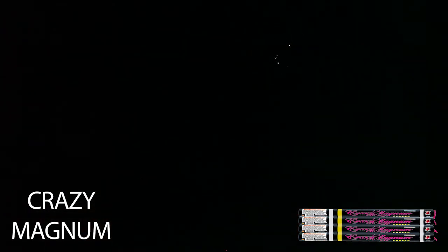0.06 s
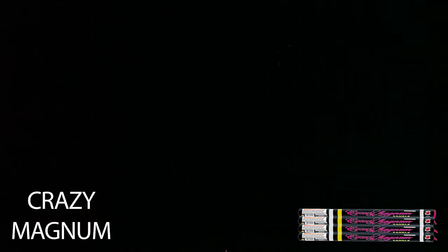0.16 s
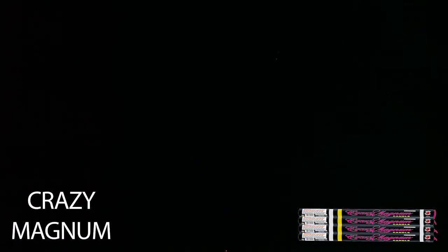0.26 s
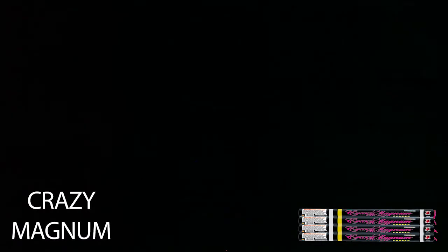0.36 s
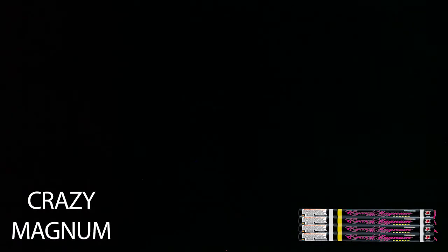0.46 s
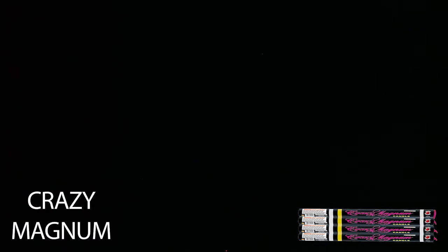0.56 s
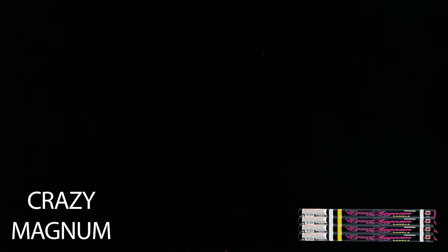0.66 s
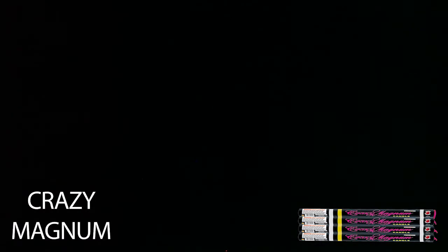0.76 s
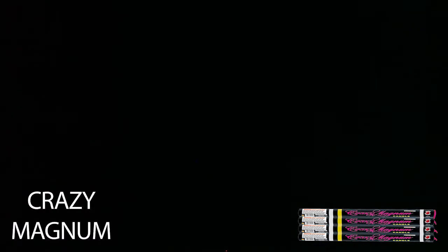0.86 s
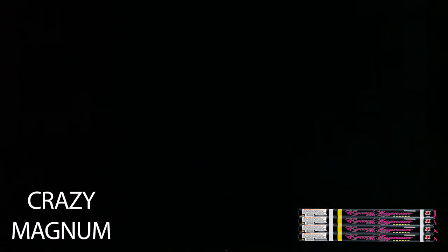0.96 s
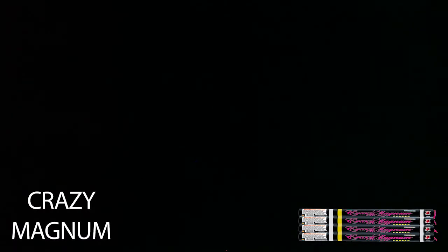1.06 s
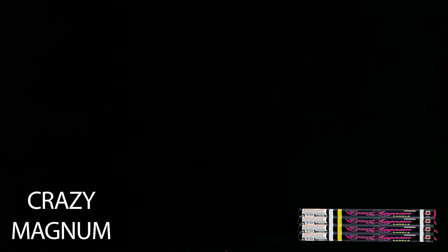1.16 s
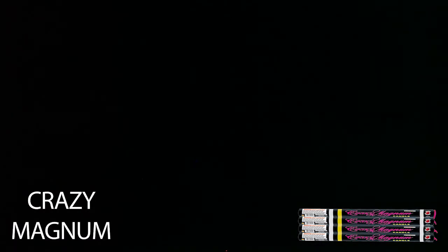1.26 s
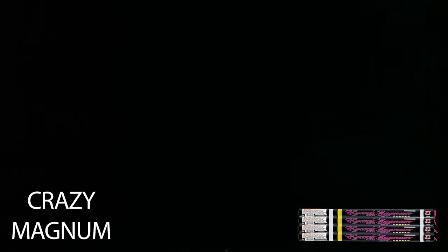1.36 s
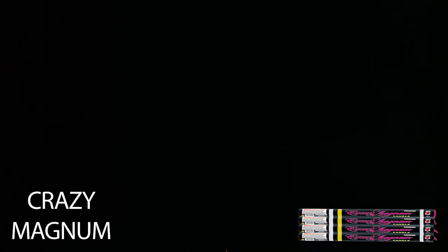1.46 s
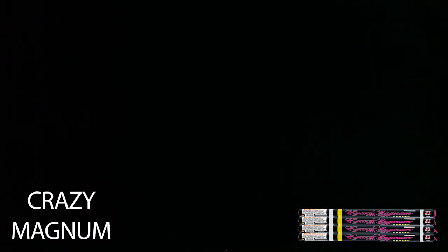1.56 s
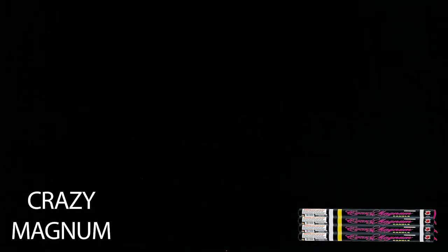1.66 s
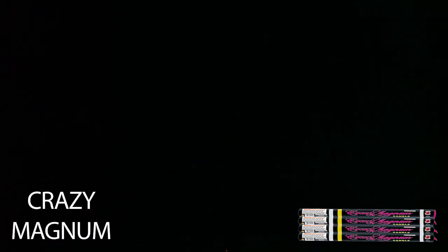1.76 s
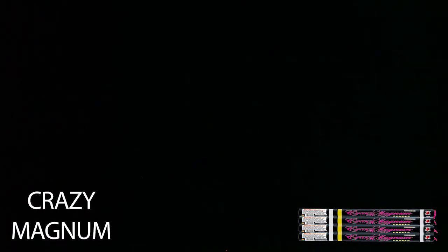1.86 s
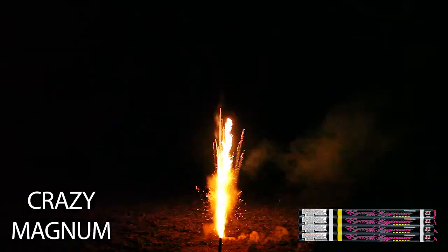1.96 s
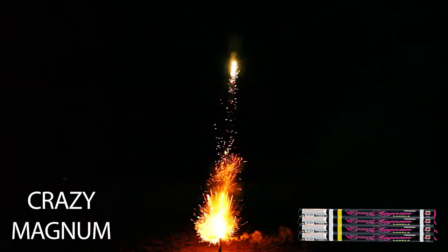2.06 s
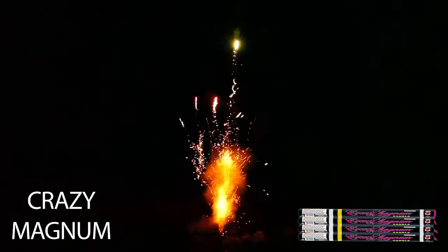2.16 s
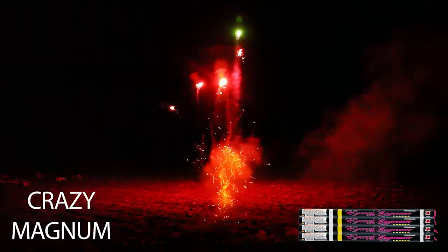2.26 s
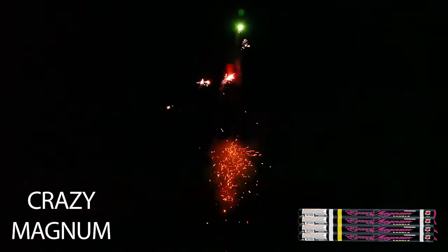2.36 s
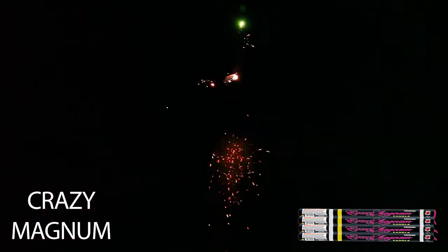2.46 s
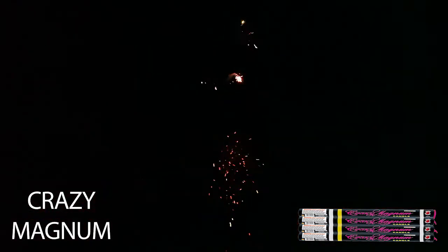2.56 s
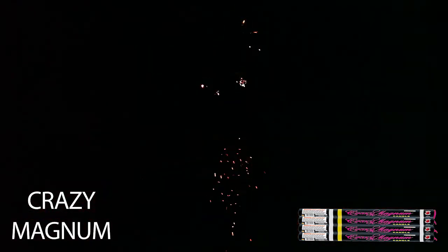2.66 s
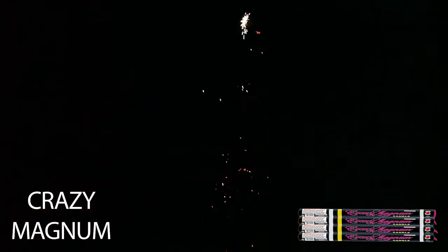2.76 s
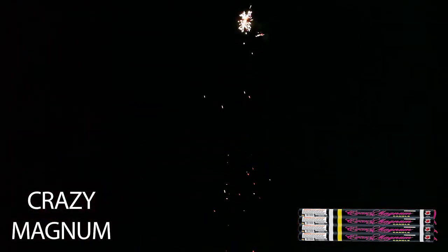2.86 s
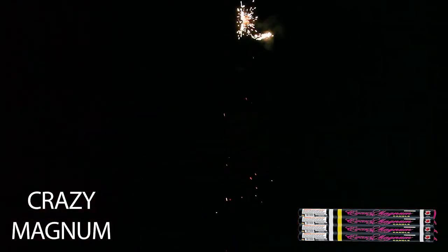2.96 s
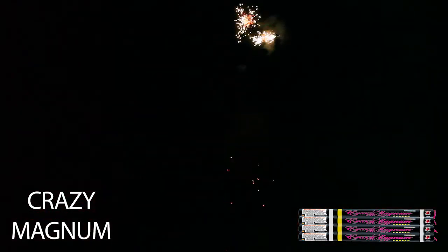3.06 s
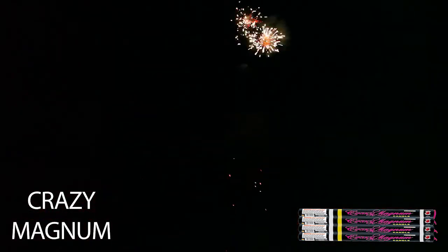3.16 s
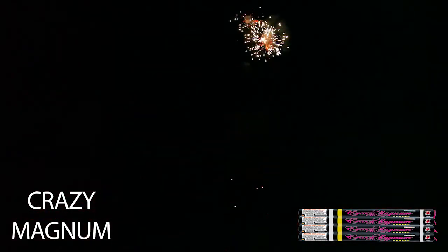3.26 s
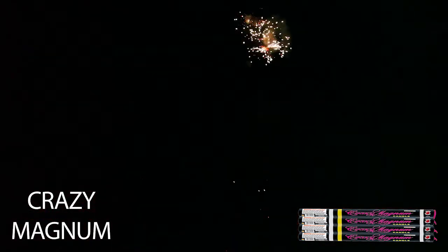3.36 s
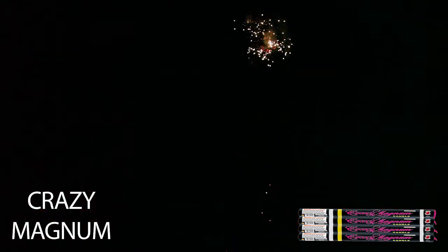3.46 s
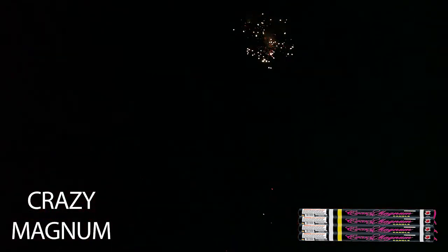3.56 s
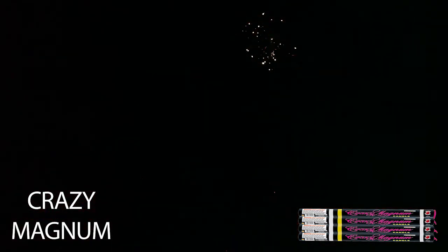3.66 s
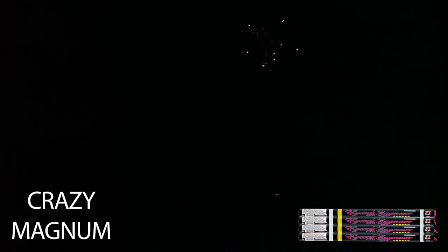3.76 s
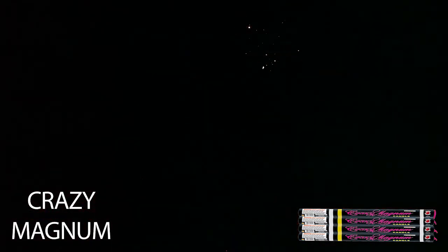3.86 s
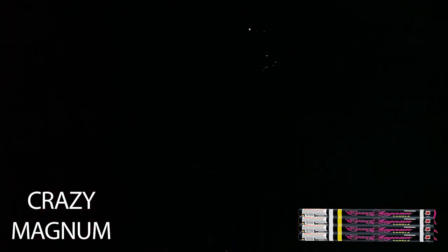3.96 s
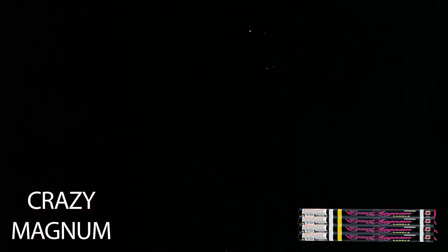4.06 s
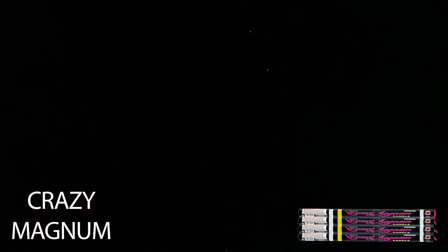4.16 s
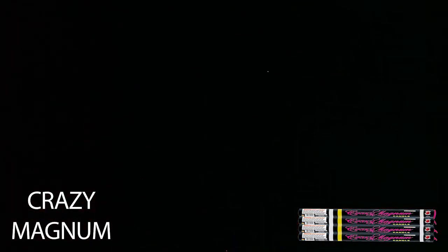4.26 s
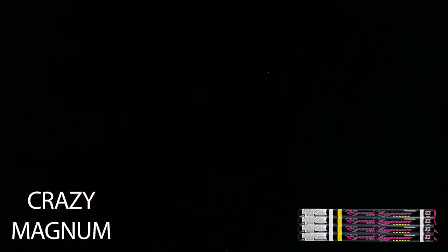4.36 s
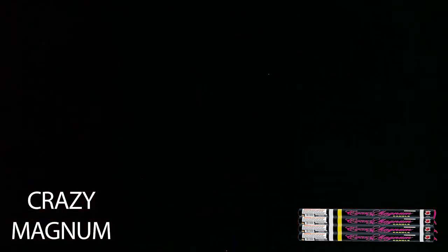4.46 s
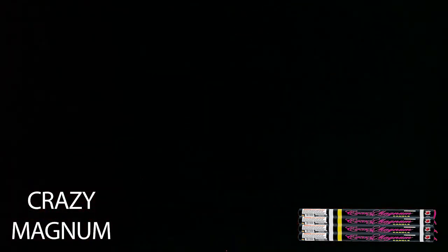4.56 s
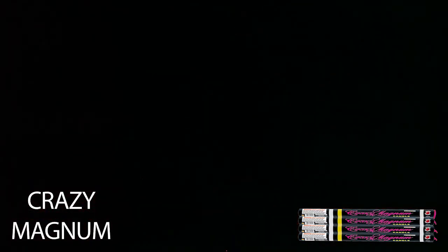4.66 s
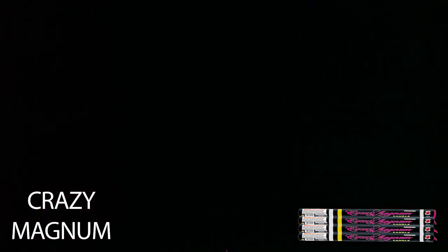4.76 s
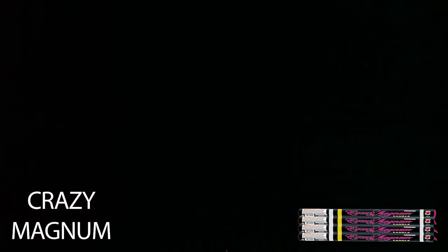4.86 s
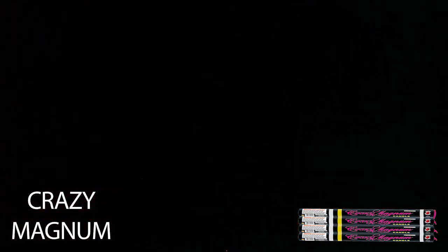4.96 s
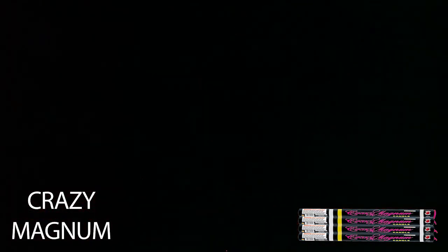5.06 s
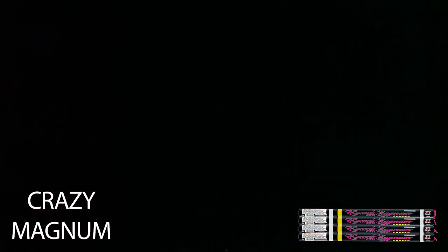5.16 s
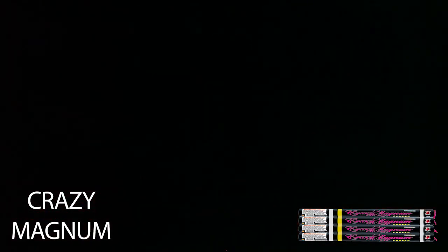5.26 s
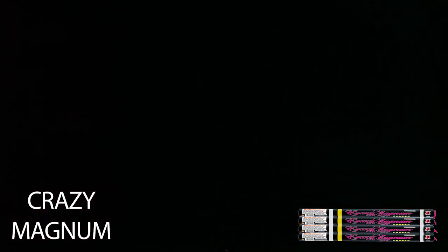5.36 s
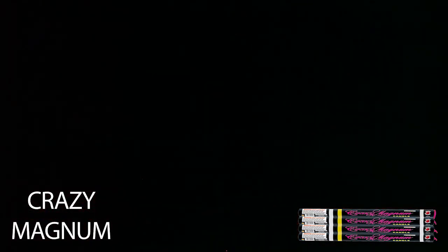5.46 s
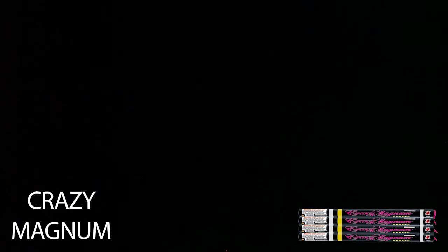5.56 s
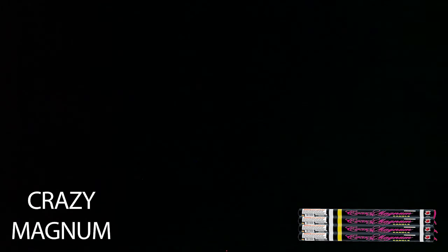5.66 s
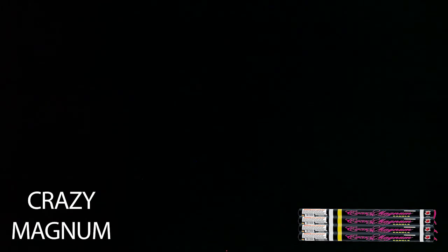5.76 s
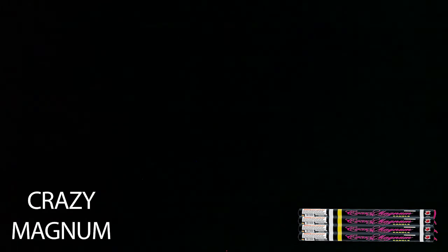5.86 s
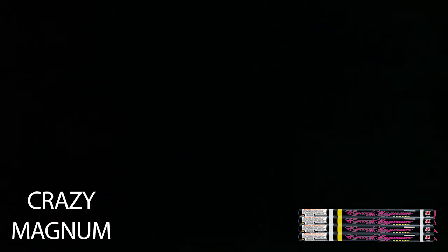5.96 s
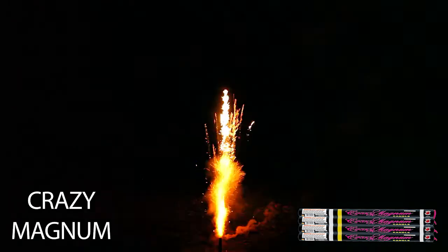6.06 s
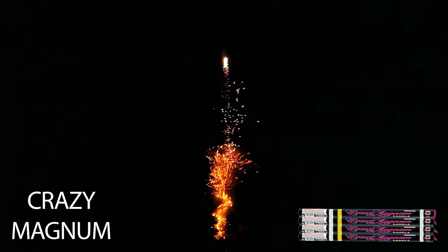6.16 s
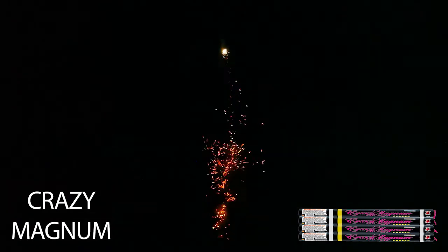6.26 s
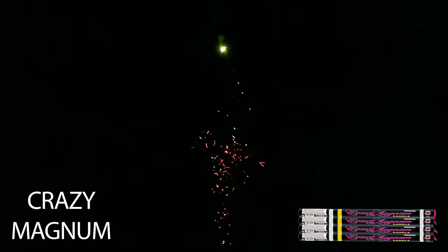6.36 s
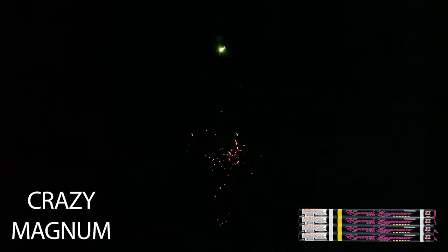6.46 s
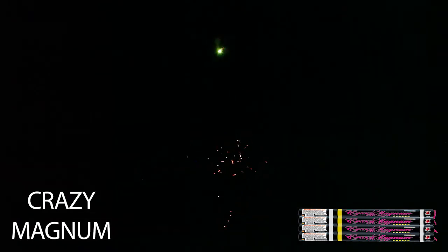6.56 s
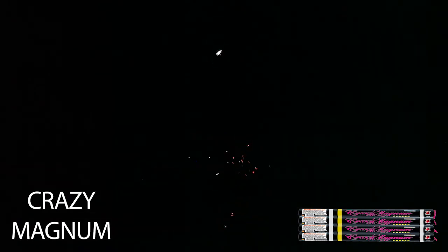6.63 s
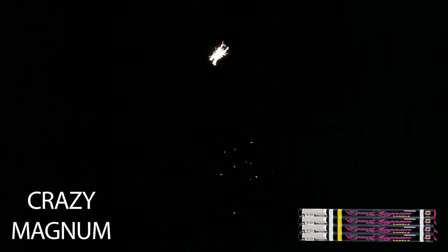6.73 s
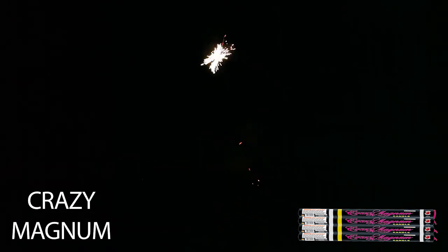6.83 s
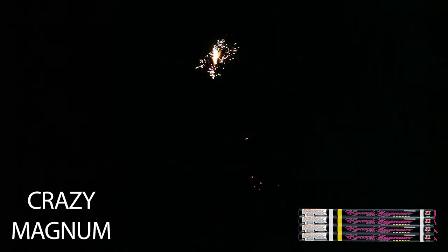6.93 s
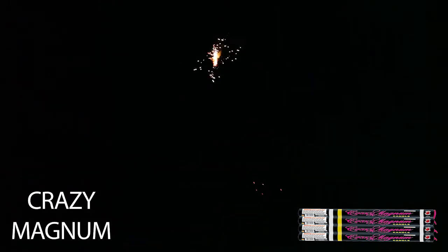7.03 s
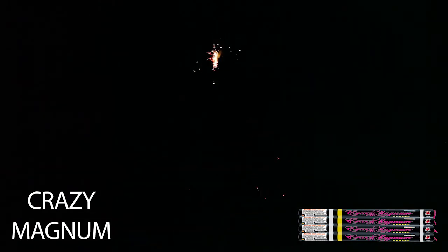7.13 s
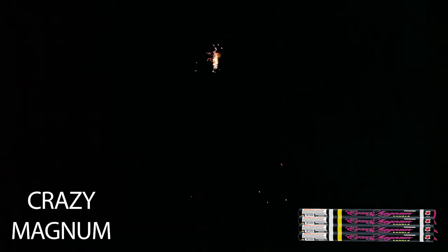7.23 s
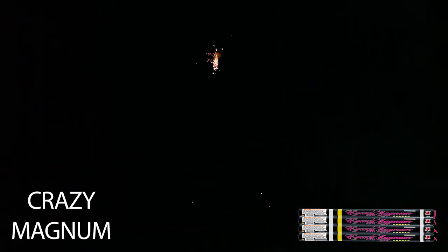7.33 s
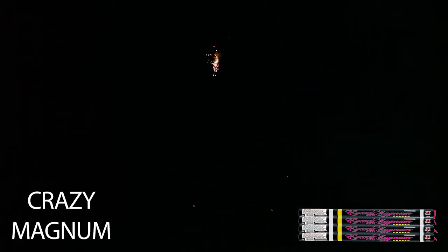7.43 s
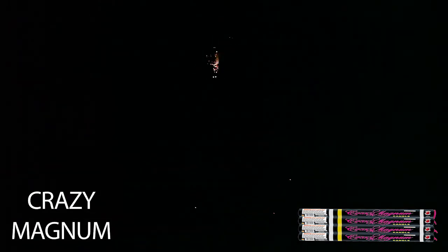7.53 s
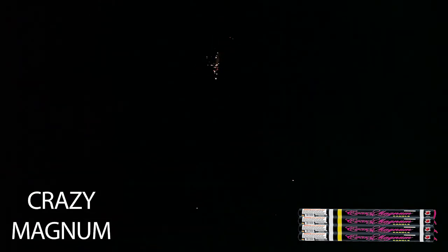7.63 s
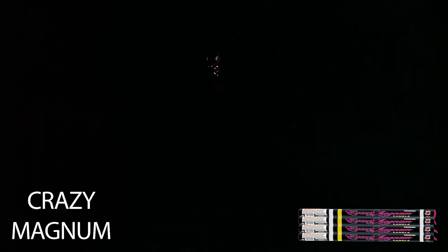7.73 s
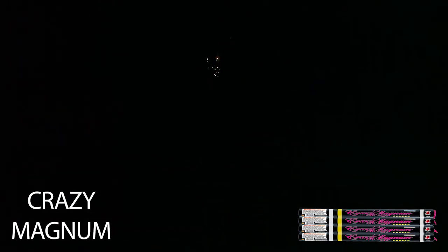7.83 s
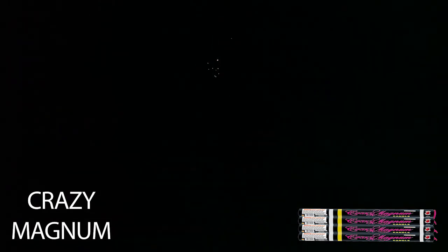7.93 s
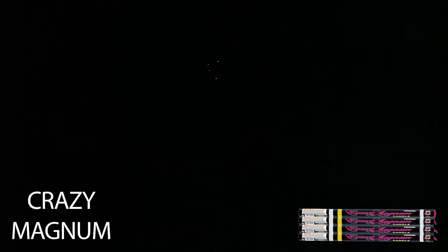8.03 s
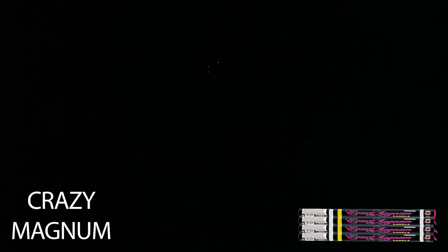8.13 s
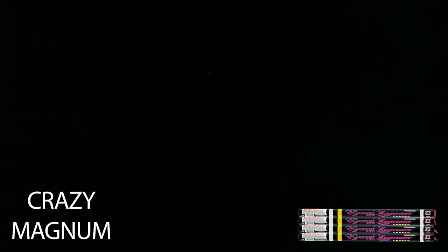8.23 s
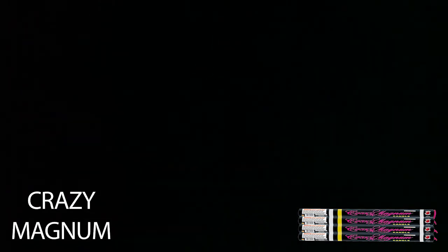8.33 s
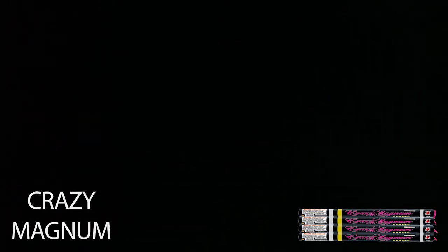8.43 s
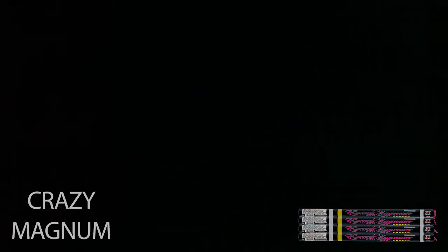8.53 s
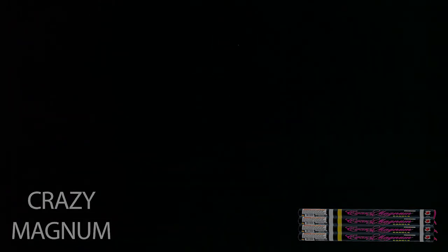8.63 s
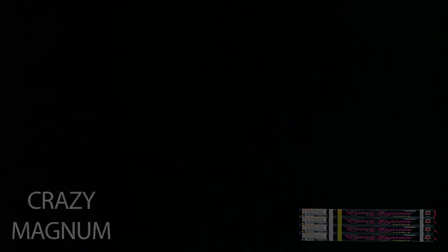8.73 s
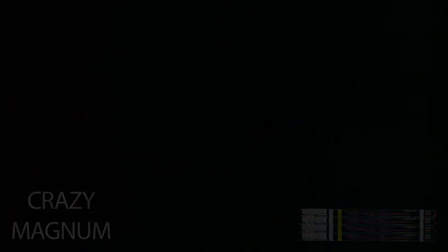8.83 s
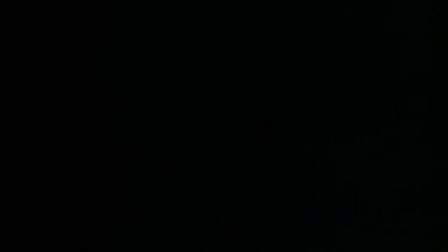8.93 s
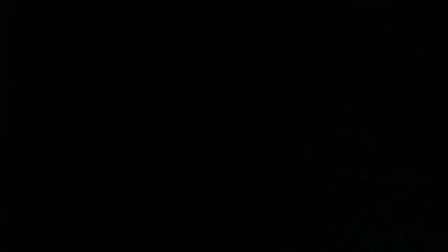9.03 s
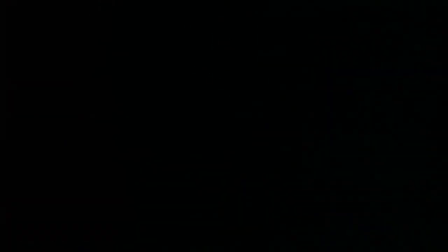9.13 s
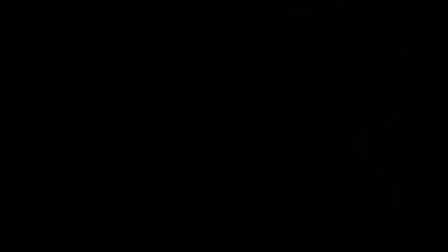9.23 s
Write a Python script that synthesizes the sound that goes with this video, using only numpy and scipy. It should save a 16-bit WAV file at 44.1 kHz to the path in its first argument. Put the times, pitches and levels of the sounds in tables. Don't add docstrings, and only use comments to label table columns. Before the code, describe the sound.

Close outdoor pickup of a firework tube at night: weak uneven fizzing, a quick double bang with low thumps and short field echoes, spitting embers, then a rough crackling rush in the air. The fuse burns on with a hollow, resonant sputter. One stronger bang follows, then a brief rapidly pulsing burn and a bright snap. Dull taps and soft rustling remain, with hiss and wind pumping back before the fade.

```python
import sys
import numpy as np
from scipy import signal
from scipy.fft import rfft, irfft
from scipy.io import wavfile
from scipy.ndimage import uniform_filter1d

SR = 44100
rng = np.random.default_rng(int(sys.argv[2]) if len(sys.argv) > 2 else 0)


def bounce(signal):
    frames = np.transpose(np.atleast_2d(signal))
    limited = np.clip(frames, -1, 1)
    pcm = np.round(limited * 32767).astype(np.int16)
    wavfile.write(sys.argv[1], SR, pcm)


def natural_amplitude(level_db):
    exponent = np.asarray(level_db, float) / 20
    return 10 ** exponent


N = 409813

# pitch_hz, level_db (per Hz)
STAR = [(70, -54.5), (120, -29.5), (325, -1), (520, -8), (700, -1), (1000, -2.5), (3800, 0), (4870, -2),
        (5610, -9), (6740, -11.5), (8300, -14.5), (9300, -20.5), (13000, -20.5), (15600, -31)]


def evened(x):
    return x / np.sqrt(np.mean(x ** 2) + 1e-20)


def read(points, hz):
    f, value = np.transpose(points)
    return np.interp(np.log(hz + 1), np.log(f + 1), value)


def add(mix, s, sound):
    part = mix[round(s * SR):][:len(sound)]
    part += sound[:len(part)]


def coloured(x, points):
    gain = natural_amplitude(read(points, np.fft.rfftfreq(len(x), 1 / SR)))
    return evened(irfft(rfft(x) * gain, len(x)))


def resonate(x, hz, width):
    turn = np.exp(2j * np.pi * np.cumsum(hz * np.ones(len(x))) / SR)
    r = np.exp(-np.pi * width / SR)
    return 2 * (turn * signal.lfilter([1 - r], [1, -r], x / turn)).real


def dipped(x, hz, width, db):
    return x - (1 - natural_amplitude(db)) * resonate(x, hz, width)


def flutter(size, ms):
    span = int(ms * SR / 1000)
    return evened(uniform_filter1d(uniform_filter1d(rng.standard_normal(size), span), span))


def bumps(t, rows, rise=1.4, fall=1.0):
    total = 0
    for at, db, ms in rows:
        u = (t - at) * 1000 / ms
        total = total + db * np.exp(-(u * np.where(u < 0, rise, fall)) ** 2)
    return total


def ducking(t):
    duck_s = [
        -1.9,
        1.935,
        2.095,
        3.3,
        6.07,
        6.92,
    ]
    # depth_db, settling_s, held_s
    ducks = [(23.94, .1, 1), (12.905, .03, 0.34), (21, .065, 0.83), (3.5, .15, 0.74), (28, 0.1, 0.47),
             (12.96, .03, 0.34)]
    recover_s = 0.64
    pulls = []
    for s, (db, settle, held) in zip(duck_s, ducks):
        sinking = 1 - np.exp(-np.maximum(t - s, 0) / settle)
        recovering = np.exp(-np.maximum(t - s - held, 0) / recover_s)
        pulls.append(db * sinking * recovering)
    return np.max(pulls, 0)


def background():
    # pitch_hz, level_db (per Hz)
    hiss_colour = [(88, -40), (150, -4), (290, -2), (339, -4.5), (481, -4), (912, -6.5), (967, -3),
                   (1040, -7), (15500, -10.5)]
    # pitch_hz, level_db (per Hz)
    wind_colour = [(12, -45), (20, -11), (54, 0), (91, 2), (208, -13), (307, -12.5), (366, -18), (400, -10),
                   (520, -42), (880, -120)]
    # time_s, level_db
    gusts = [(0, -3), (.7, -0.5), (1.9, 1.5), (2.5, -2.5), (3.3, 2.5), (4.4, -2), (5.6, 0.5), (6.2, 5),
             (6.6, 10), (7.0, -2), (7.7, 4.5), (8.4, 2), (9.3, 0)]
    hiss_db, wind_db = -53.5, -62.5
    wind_ducked = .92
    t = np.arange(N) / SR
    duck_db = ducking(t)
    hiss_gain = natural_amplitude(hiss_db - duck_db + 0.4 * flutter(N, 30))
    hiss = coloured(rng.standard_normal(N), hiss_colour) * hiss_gain
    gusts_db = np.interp(t, *np.transpose(gusts)) + 2.1 * flutter(N, 60)
    wind_gain = natural_amplitude(wind_db - wind_ducked * duck_db + gusts_db)
    return hiss + coloured(rng.standard_normal(N), wind_colour) * wind_gain


def tube_tones(sputter, tube, pitch, tilt_db):
    size, tones = len(sputter), 0
    wander, shimmer_db = .012, 2.5
    for k, (hz, width, db) in enumerate(tube):
        tone_db = db + tilt_db * np.log2(max(hz / 1500, 1)) + shimmer_db * flutter(size, 40)
        drifting_hz = hz * pitch * (1 + wander * flutter(size, 60))
        ring = resonate(sputter, drifting_hz, width) / np.sqrt(width)
        tones = tones + (-1) ** k * natural_amplitude(tone_db) * ring
    return tones


def fizz(burn, tube, sag):
    # time_s, swell_db, length_ms
    surges = [(.12, -4, 56), (.26, 1.5, 30), (.335, 5.5, 15), (.42, 4, 35), (.505, 4, 25), (.58, -8, 30),
              (.63, -1, 15), (.7, 5, 15), (.85, -13, 130), (2.088, 10.5, 25), (2.19, 0, 12.2),
              (3.745, 1, 8), (3.92, 1.5, 20), (3.965, -3, 15), (4.44, -1.5, 48), (4.5, 1.5, 30),
              (4.61, 0, 30), (4.69, -9.5, 55), (4.73, -2, 27), (4.797, 6, 16), (4.87, 4.5, 27),
              (5.05, -3.5, 40), (5.12, 2.5, 25), (5.2, -2, 44), (5.37, 3.5, 50), (5.7, 2.5, 99),
              (6.012, 22, 16.7), (6.56, -2.5, 15), (6.66, 2, 50), (6.745, 8.5, 38), (7.02, -2.5, 21),
              (7.12, 2, 50), (7.7, -7, 49)]
    cool_s = 0.019
    surge_tilt = 0.23
    s, end, first_db, last_db, glow_db = burn
    sink, open_share, first_tilt, last_tilt = sag
    t = np.arange(s, end, 1 / SR)
    size = len(t)
    share = np.clip(open_share, 0, 1)
    surge_db = bumps(t, surges, rise=0.92, fall=0.95)
    afterglow_db = glow_db * np.exp((s - t) / cool_s)
    level_db = np.linspace(first_db, last_db, size) + afterglow_db + surge_db
    tilt_db = np.linspace(first_tilt, last_tilt, size) + surge_tilt * np.clip(surge_db, -6, 6)
    unrest_db = 0.4 * flutter(size, 35) + 1.6 * flutter(size, 9.7) + 1.0 * flutter(size, 1.3)
    sputter = rng.standard_normal(size) * natural_amplitude(unrest_db)
    pitch = 1 + sink * np.linspace(.5, -.5, size)
    inside = evened(tube_tones(sputter, tube, pitch, tilt_db))
    outside = natural_amplitude(.7 * tilt_db) * coloured(sputter, STAR)
    sound = np.sqrt(1 - share) * inside + np.sqrt(share) * outside
    return s, natural_amplitude(level_db) * sound * signal.windows.tukey(size, 400 / size)


def fuse(mix):
    # start_s, end_s, first_db, last_db, afterglow_db (of the blast before)
    burns = [
        (0, .85, -59, -62.5, 5),
        (1.952, 2.083, -55, -52.5, 4),
        (2.108, 2.805, -55.5, -63.5, 27),
        (3.44, 4.754, -46.5, -50.5, -7),
        (4.729, 6.022, -51.5, -56, 2.5),
        (6.045, 6.746, -50, -61, 21.5),
        (6.935, 7.701, -55.5, -62.5, 15.5),
    ]
    # pitch_hz, width_hz, level_db
    first_tube = [(326, 50, -0.5), (1065.6, 67, 3), (1800, 120, -1), (2420, 110, -1), (3220, 100, -5),
                  (3980, 110, -3.5)]
    second_tube = [(290, 73, 1), (686.8, 110, 3), (1000, 92, -2), (1350, 100, 4), (2140, 120, 0.5),
                   (3500, 230, -11.5), (4410, 400, -12.5)]
    third_tube = [(244, 57, -6.5), (805, 60, -6.5), (1316, 200, -3), (1900, 134, -0.5), (2380, 160, -4.5),
                  (3000, 160, -38), (3350, 470, -2.5), (4220, 150, -3.5), (4500, 450, -11), (7200, 1390, -4.5)]
    fourth_tube = [(223, 41, -3.5), (802.5, 47, -9.5), (1200, 180, -1.5), (1796, 180, 0), (2220, 110, -1.5),
                   (3380, 130, -5), (4390, 200, -19)]
    fifth_tube = [(200, 150, -7), (378, 120, -1.5), (775, 110, -3.5), (1150, 130, -2.5), (1490, 200, -6),
                  (2200, 120, -0.5), (3190, 400, -15.5), (4200, 500, -14.5)]
    tubes = [first_tube, second_tube, second_tube, third_tube, fourth_tube, fifth_tube, fifth_tube]
    # sinking of the tones (share), heard in open air (share 0-1),
    # first_tilt_db and last_tilt_db of the treble (per octave)
    sags = [(.01, .08, 1, -6), (.01, 0.56, -0.5, -4.5), (.01, .6, -6.5, 0), (.04, 0.16, -2, -0.5),
            (.04, .15, 2, -4), (.01, 0.47, -0.5, -4), (.01, 0.99, -2, -5)]
    for burn, tube, sag in zip(burns, tubes, sags):
        add(mix, *fizz(burn, tube, sag))


def tick(s, db, ms, damping):
    u = np.arange(900) / SR * 1000 / ms
    wave = np.sin(np.pi * u) * np.exp(-damping * (u - .5))
    band = signal.butter(1, (300, 8994), "band", fs=SR, output="sos")
    return s - .0001, natural_amplitude(db) * signal.sosfilt(band, wave)


def ticks(mix):
    # start_s, peak_db, half_cycle_ms, damping (per half-cycle)
    cracks = [(0.0477, -32, 0.27, 2.42), (0.05, -47, 0.46, 0.57), (0.0814, -40, 0.51, 1.2),
              (1.122, -35.5, 0.29, 0.6), (1.1222, -43, .13, .4), (2.581, -50, 0.058, .6),
              (2.595, -51, .06, .6), (2.653, -53, .1, .6), (3.5547, -28.5, 0.17, 0.77),
              (6.7427, -26.5, .35, 1.53), (6.9313, -4.5, 0.14, 1.3), (6.9339, -12, 0.46, 1.37),
              (7.092, -31, 0.182, 1), (7.1197, -50, 0.168, 0.32), (7.174, -46, 0.434, 0.48),
              (7.2432, -47, 0.32, 0.48), (7.2701, -36.5, 0.32, 1.9), (7.4157, -34, 0.29, 1.7),
              (7.4376, -46.5, 0.49, .4), (7.9849, -40.5, 0.16, 0.393)]
    for row in cracks:
        add(mix, *tick(*row))


def blast(s, db, hz, fall_ms):
    # pitch_hz, level_db (per Hz)
    jet_colour = [(180, -23.5), (300, 3.5), (553, -4), (2210, -5), (2610, -8.5), (4070, -6.5),
                  (5310, -13.5), (8570, -17), (15500, -25.5)]
    rise_ms = 0.94 * fall_ms
    boom_db = -21.5 + .62 * db - 13 * np.log2(max(hz / 4000, 1))
    ms = np.arange(-400, 1600) / SR * 1000
    shape = np.where(ms < 0, np.exp(-(ms / rise_ms) ** 2), np.exp(-np.abs(ms) / fall_ms))
    glide = 1 + 0.0044 * np.clip(ms, -5, 8)
    noise = rng.standard_normal((3, len(ms)))
    roar_colour = [(f, d + (f > 6000) * 6 * np.log2(hz / 8000)) for f, d in jet_colour]
    whistle = evened(resonate(resonate(noise[0], hz * glide, .42 * hz), hz * glide, 0.46 * hz))
    roar = min(hz / 2200, 1.3) * coloured(noise[1], roar_colour)
    jet = 0.59 * whistle + 0.71 * roar
    boom = evened(resonate(resonate(noise[2], 225, 190), 225, 190))
    return s - 400 / SR, shape * natural_amplitude(db) * jet + shape ** 0.45 * natural_amplitude(boom_db) * boom


def lift_charges(mix):
    # start_s, level_db, jet_tone_hz, length_ms
    puffs = [(1.918, -42.5, 1000, 8), (1.924, -23, 1200, 2.2), (1.9287, -8.5, 3372, 2.2),
             (1.932, -9.5, 2200, 2), (1.936, -6, 1001, 1.8), (1.9373, -1, 2244, 1.9),
             (1.9415, -2.5, 2892, 2.1), (1.9421, -12, 8891, 1), (1.9461, -19, 2528, 4),
             (1.9467, -24.5, 6000, 2.5), (1.9625, -30, 6314, .9), (2.0853, -29, 850, 2.5),
             (2.0894, -6.5, 1150, 1.1), (2.0913, -7.5, 1500, 1.8), (2.0921, -16.5, 7996, 1.1),
             (2.0928, -11, 879, 2.2), (2.095, -8, 2805, 1.7), (2.096, -11.5, 2021, 3.6),
             (2.1004, -21.5, 3500, 3), (2.114, -28, 1800, 1), (2.1125, -37, 6000, 1.5),
             (6.01, -31, 1505, 3.3), (6.0158, -19.5, 3380, 2.5), (6.0204, -6, 1893, 2.1),
             (6.0233, -10.5, 3500, 2), (6.0275, -7, 4200, 2), (6.028, 4, 2000, 1.7),
             (6.0282, -11.5, 9516, 1), (6.0311, -9, 8376, .9), (6.032, 2, 1311, 2), (6.037, -14, 2473, 2.8),
             (6.049, -16.5, 1608, 1.1),
             (1.9335, -13, 760, 2.5), (1.942, -22, 13010, .8), (2.0935, -22, 12490, 1.2),
              (6.0293, -17, 12990, 1.2), (6.032, -20, 12000, 1), (6.0372, -22, 7490, 1.5),
              (6.049, -31, 8500, .6)]
    for row in puffs:
        add(mix, *blast(*row))


def thump(s, db, hz, t60):
    t = np.arange(4000) / SR
    turns = hz * .005 * np.log(1 + t / 0.0046)
    return s, -natural_amplitude(db - 60 * t / t60) * np.sin(2 * np.pi * turns) * 2


def thumps(mix):
    # start_s, level_db, pitch_hz, die_away_s (to -60 dB)
    shoves = [
        (1.9313, -11.5, 290, 0.019),
        (1.9355, -15, 220, 0.023),
        (1.9424, -9.5, 240, 0.022),
        (2.093, -14, 260, .024),
        (6.0194, -12, 300, .016),
        (6.0241, -8.5, 350, 0.015),
        (6.029, -2, 195, .026),
    ]
    for row in shoves:
        add(mix, *thump(*row))


def tap(s, db, hz, cycles):
    turns = np.arange(-1500, 1500) / SR * hz
    ring = np.sin(2 * np.pi * turns) * np.exp(-(2.8 * turns / cycles) ** 2)
    return s - 1400 / SR, 1.23 * natural_amplitude(db) * ring


def wall_returns(mix):
    # start_s, peak_db, pitch_hz
    swings = [(1.9628, -32, 155.8), (1.967, -37.5, 270), (2.1141, -36, 160.2), (2.12, -38, 280),
              (2.19, -52, 210), (6.0506, -30, 140.3)]
    for row in swings:
        add(mix, *tap(*row, cycles=5.2))


def spitting_embers(mix):
    # start_s, peak_db, pitch_hz
    spits = [(1.985, -30.5, 520), (2.018, -43, 398), (2.216, -44, 391.1), (6.111, -36.5, 363),
             (6.123, -46.5, 350), (6.134, -42.5, 390), (6.156, -40, 773), (6.169, -48, 740),
             (6.206, -46, 710), (6.231, -52.5, 425), (6.257, -43, 803), (6.286, -49, 753.8)]
    for row in spits:
        add(mix, *tap(*row, cycles=0.98))


def rush(star, colour, spectrum):
    # time_s, over_rush_db, length_ms, extra_top_treble_db
    flares = [(2.79, 5.5, 5.2, 13), (2.801, 4.5, 8, 7), (2.821, -9, 4, 10), (2.837, 1.5, 6, 1),
              (2.876, -5.5, 5, 3), (2.888, 5.5, 7.5, -2), (2.898, 3, 3.9, -1), (2.923, 2, 7, 5),
              (2.949, 4.5, 5.1, -0.5), (2.961, 4, 4, -1), (2.98, 3.5, 5, 6), (2.99, 4.5, 5.5, -1),
              (3.029, 3, 6, 1), (3.0562, 9.5, 3.5, -5), (3.092, 2, 4, -0.5), (3.124, 3.5, 5, -1.5),
              (3.173, 0.5, 11, 3.5), (3.204, 3, 8, -2.5), (3.232, -3, 1.9, 2), (3.253, 2.5, 14.4, 0.5),
              (3.271, 3, 4, 0), (3.277, -4.5, 1.28, 0.5), (3.287, 7, 9.2, -1), (3.299, 4, 8.1, 3),
              (3.318, -1, 1.96, 6), (3.326, 2, 4, 0), (3.338, -2, 3, 3.5), (3.345, -3, 3.6, 0),
              (3.363, 4.5, 7.7, 2.5), (3.377, 3.5, 6, -1.5), (3.39, -4.5, 6.2, -1), (3.408, -5, 1.65, 2),
              (3.423, 1, 3, -1), (3.433, 2.5, 4, -4.5), (3.444, -4.5, 5.8, 2), (3.468, 7, 2.8, -4),
              (3.482, 2, 2.5, -3)]
    spins = [(6.743, 1, 2.5, 2), (6.749, 8, 3.56, 5), (6.761, 0, 3.3, 10.5), (6.7725, 12.5, 4.2, 0),
             (6.786, 9, 4, 2), (6.798, 10, 5.7, 1), (6.8105, 5.5, 3.5, 3), (6.822, 8.5, 4.5, 3.5),
             (6.8345, 6.5, 4.5, 2), (6.848, 7.5, 5.5, 1.5), (6.861, 7.5, 3.6, -2), (6.875, 9.5, 5.5, 1),
             (6.8885, 8.5, 3.7, -3), (6.903, 9, 5.8, -2), (6.913, 5.5, 2.5, 1), (6.9215, 11.5, 5.5, 0.5),
             (6.93, 3.5, 2, 4.5)]
    trail_s, trail_db = 0.275, -26.5
    smoulder_db, snuff_db, snuff_s = -18, -18, 0.0133
    s, catching, full, out, full_db = star
    full_tilt, tilt_per_db, full_top, top_per_db, trail_top = colour
    t = np.arange(s, out + trail_s, 1 / SR)
    size = len(t)
    after = np.maximum(t - out, 0)
    gone = 1 - np.exp(-after / snuff_s)
    grown = np.clip((t - catching) / (full - catching), 0, 1) ** 0.777
    growth_db = smoulder_db * (1 - grown)
    weak_db = growth_db + snuff_db * gone + trail_db * after / trail_s
    tilt_db = full_tilt + tilt_per_db * weak_db
    top_db = full_top + top_per_db * growth_db + trail_top * gone
    snap_gain = natural_amplitude(2.6 * np.minimum(rng.exponential(1, size), 3))
    snaps = (rng.random(size) < 3500 / SR) * snap_gain * rng.choice([-1, 1], size)
    hiss = rng.standard_normal(size) * natural_amplitude(0.59 * flutter(size, 1.0) + 1.5 * flutter(size, 2.2))
    wide = coloured(evened(hiss) + 0.82 * evened(snaps), spectrum)
    both = [*flares, *spins]
    flare_db = bumps(t, [(at, db, ms) for at, db, ms, top in both])
    spark_db = bumps(t, [(at, top, ms) for at, db, ms, top in both])
    low = signal.sosfilt(signal.butter(1, 1800, fs=SR, output="sos"), wide)
    middle = signal.sosfiltfilt(signal.butter(3, 5600, fs=SR, output="sos"), wide - low)
    top_band = (wide - low - middle) * natural_amplitude(top_db + spark_db)
    sound = low * natural_amplitude(-tilt_db) + (middle + top_band) * natural_amplitude(tilt_db)
    return s, sound * natural_amplitude(full_db + weak_db + flare_db) * signal.windows.tukey(size, 300 / size)


def burning_stars(mix):
    # lit_s, catching_s, full_s, out_s, full_db
    stars = [
        (2.778, 2.856, 3.139, 3.448, -31.5),
        (6.739, 6.77, 6.9, 6.93, -27.5),
    ]
    # full_tilt_db, tilt_db (per dB of level), full_top_treble_db,
    # top_db (per dB of growth), trail_top_db
    colours = [
        (-1, 0.1512, 1, 0.32, 12),
        (2, 0, -2.5, -0.06, 6.5),
    ]
    # pitch_hz, level_db (per Hz)
    spinner = [(70, -62), (120, -34), (415, -5.5), (590, -14.5), (800, -2), (1050, -7.5), (2000, -4.5),
               (3800, -2), (5000, -3), (5610, -9), (6900, -9), (8400, -16), (9400, -21.5), (13000, -24),
               (15600, -35)]
    for star, colour, spectrum in zip(stars, colours, (STAR, spinner)):
        add(mix, *rush(star, colour, spectrum))


def rustle():
    # time_s, level_db
    settling = [(7.45, -67), (7.8, -72.5), (8.0, -65), (8.2, -74.5), (8.55, -64), (8.8, -63), (9.1, -67.5)]
    s, db = np.transpose(settling)
    level_db = np.interp(np.arange(s[0], s[-1], 1 / SR), s, db)
    size = len(level_db)
    grains = rng.standard_normal(size) * natural_amplitude(2.8 * flutter(size, 2.6))
    return s[0], natural_amplitude(level_db) * evened(resonate(resonate(grains, 770, 1000), 770, 1035))


def landing_cinders(mix):
    # start_s, peak_db, pitch_hz
    taps = [(7.509, -57.5, 641), (7.861, -48.5, 653), (7.958, -47, 680), (8.006, -52.5, 589.6),
            (8.036, -48, 1000), (8.203, -51.5, 724), (8.538, -49, 674), (8.564, -55, 633),
            (8.672, -46, 700)]
    for row in taps:
        add(mix, *tap(*row, cycles=2.92))


def field(x):
    # delay_s, level_db
    echoes = [
        (.0025, -22),
        (0.043, -37),
        (.083, -35.5),
        (.128, -44.5),
    ]
    # pitch_hz, die_away_s (to -60 dB)
    lasting = [(60, .4), (250, 0.77), (1000, .45), (4000, .4), (12000, .2)]
    # pitch_hz, level_db
    scatter = [(40, -13.5), (100, -8), (160, -8), (340, -8), (550, -0.5), (900, -6), (2000, -14.5),
               (4000, -11), (6500, -4), (12000, -4)]
    clicks = np.zeros(SR)
    at = np.arange(300, SR - 20, 20)
    clicks[at + rng.integers(0, 20, len(at))] = rng.choice([-1., 1.], len(at))
    hz, t, z = signal.stft(clicks, SR, nperseg=256)
    early = natural_amplitude(-60 * t / 0.089)
    late = natural_amplitude(-18.5 - 60 * t / read(lasting, hz)[:, None])
    tail = signal.istft(z * (early + late), SR, nperseg=256)[1]
    tail *= natural_amplitude(-16.0) / np.linalg.norm(tail)
    for delay, db in echoes:
        tail[round(delay * SR)] += natural_amplitude(db)
    gain = natural_amplitude(read(scatter, np.fft.rfftfreq(len(tail), 1 / SR)))
    tail = irfft(rfft(tail) * gain, len(tail))
    return signal.fftconvolve(x, tail[:SR - SR // 10])[:N]


def scene():
    # pitch_hz, width_hz, level_db
    ground_dip = (575, 160, -12)
    # pitch_hz, width_hz, level_db
    notch = (5600, 500, -9.5)
    shots, loud, near = np.zeros((3, N))
    fuse(near)
    ticks(loud)
    lift_charges(shots)
    thumps(shots)
    wall_returns(loud)
    spitting_embers(loud)
    burning_stars(loud)
    add(near, *rustle())
    landing_cinders(loud)
    loud = loud + dipped(shots, *ground_dip)
    air = dipped(loud + field(loud) + near, *notch)
    air = signal.sosfilt(signal.butter(2, 55, "high", fs=SR, output="sos"), air)
    return (air + background())[None]


def roll_off(x):
    return signal.sosfilt(signal.butter(12, 15670, fs=SR, output="sos"), x)


def record(dry):
    # time_s, peak (1 = full scale)
    overload = [(2.0, 1.04), (2.05, 0.54), (2.5, 0.54), (3.0, 1.06)]
    # full_s, silent_s
    fade_s = (8.29, 9.55)
    t = np.arange(N) / SR
    ceiling = np.interp(t, *np.transpose(overload))
    clipped = dry / (1 + np.abs(dry / ceiling) ** 6) ** (1 / 6)
    faded = clipped * np.interp(t, fade_s, (1, 0))
    edge = signal.firwin(511, 15800, window=("kaiser", 8), fs=SR)
    finished = signal.oaconvolve(faded, edge[None], "same")
    return roll_off(finished)


dry = scene()
out = record(dry)
bounce(out)
```